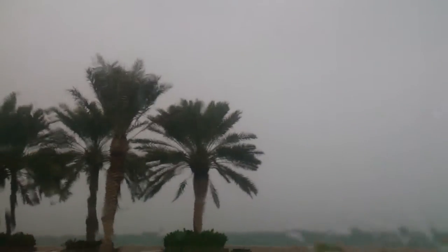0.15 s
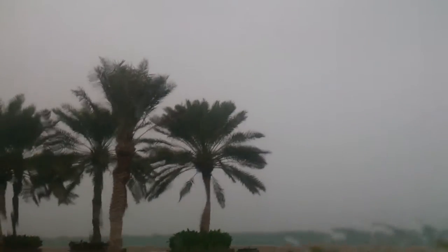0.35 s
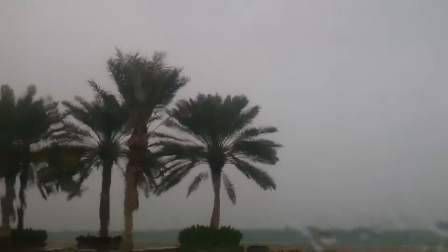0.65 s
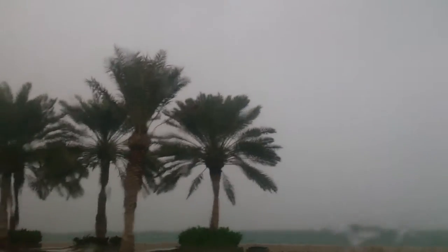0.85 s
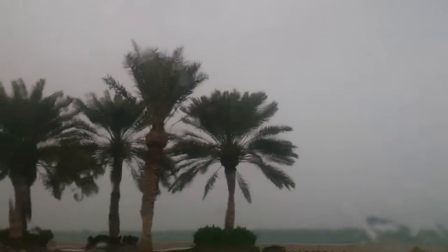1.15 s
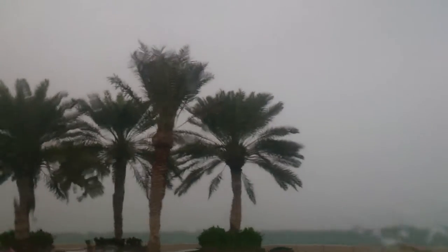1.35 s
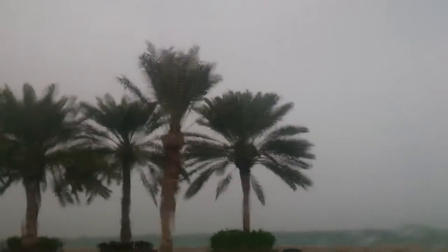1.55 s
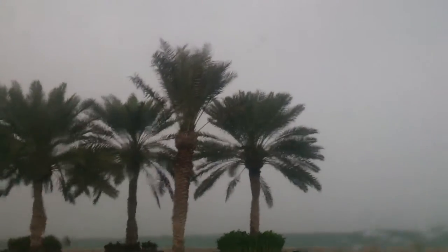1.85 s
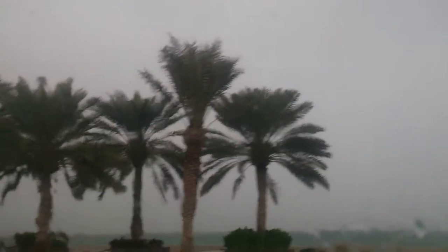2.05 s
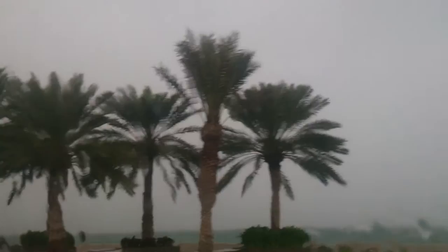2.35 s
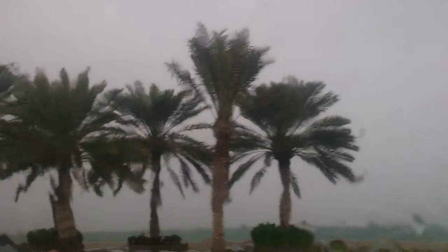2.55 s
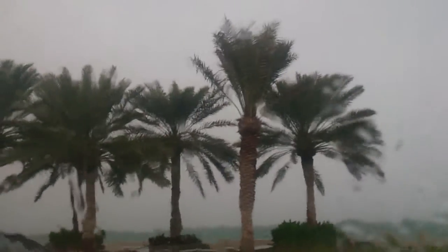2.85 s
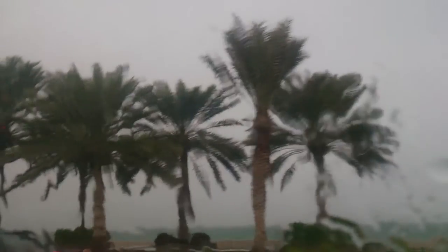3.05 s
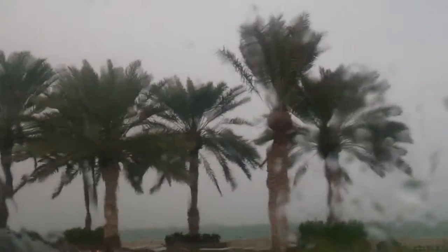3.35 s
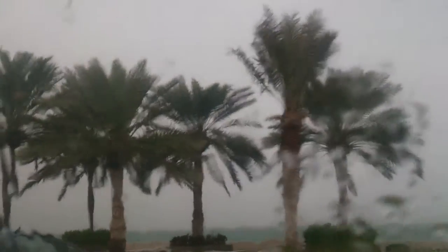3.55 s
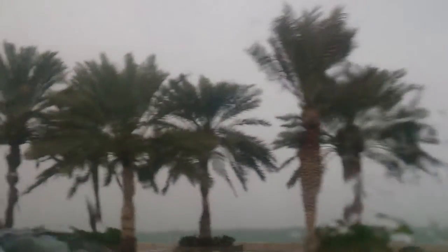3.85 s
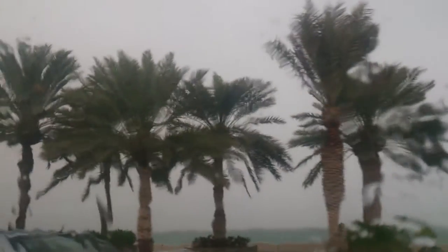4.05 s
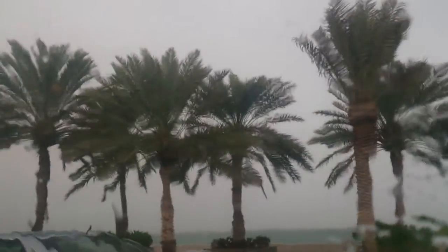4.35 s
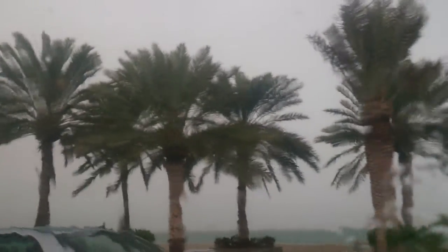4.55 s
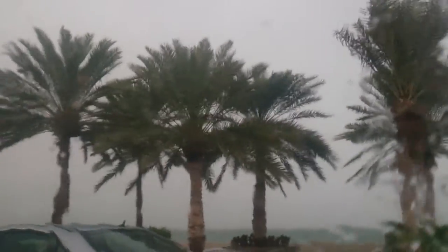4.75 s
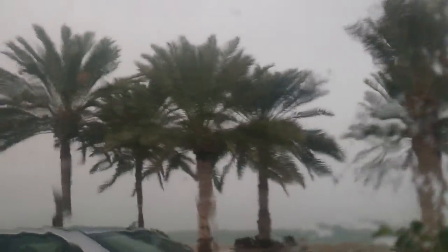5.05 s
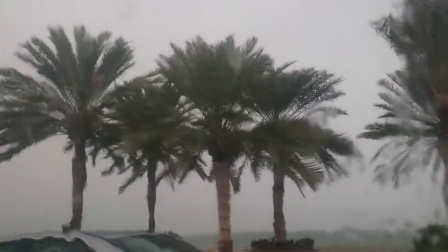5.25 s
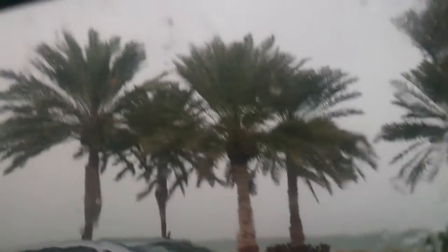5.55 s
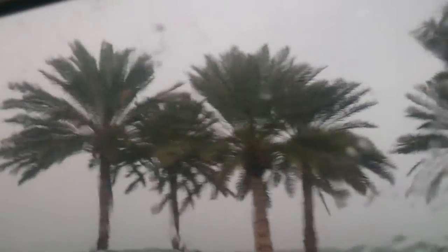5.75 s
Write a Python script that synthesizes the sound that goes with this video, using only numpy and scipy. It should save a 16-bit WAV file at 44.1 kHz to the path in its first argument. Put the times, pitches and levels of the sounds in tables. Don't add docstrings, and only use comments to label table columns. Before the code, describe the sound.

From inside a closed, creeping car, wind shoves the body with a deep, shuddering rumble while the engine booms low, rising briefly past the middle and sinking again. Rain hisses softly on roof and glass. Fine ticks scatter throughout, and heavy drops knock a panel close to the left microphone, mostly in the second half. Small trim rattles and two tiny seal squeaks pass quickly.

```python
import sys
import numpy as np
from scipy import signal
from scipy.fft import rfft, irfft, next_fast_len
from scipy.io import wavfile
from scipy.ndimage import uniform_filter1d, map_coordinates

SR = 44100
rng = np.random.default_rng(int(sys.argv[2]) if len(sys.argv) > 2 else 0)


def materialize(psi):
    bounded = np.clip(np.atleast_2d(psi).T, -1, 1)
    quanta = np.round(bounded * 32767).astype(np.int16)
    wavfile.write(sys.argv[1], SR, quanta)


def ratio(d):
    e = np.asarray(d, float) / 20
    return 10 ** e


N = 260190
TOP_HZ = 14750


def unit(x):
    return x / np.sqrt(np.mean(x ** 2) + 1e-20)


def along(points, hz):
    f, v = np.transpose(points)
    return np.interp(np.log(hz + 1), np.log(f + 1), v)


def curves(rows):
    s, *cols = np.transpose(rows)
    return [np.interp(np.arange(N) / SR, s, c) for c in cols]


def wobble(rate):
    knots = rng.standard_normal(400)
    return map_coordinates(knots, [np.arange(N) * rate / SR], mode="mirror")


def swells(rows):
    t = np.arange(N) / SR
    return sum(db * np.exp(-((t - s) / half) ** 2) for s, db, half in rows)


def filtered(x, response):
    m = next_fast_len(x.shape[-1] + 8192)
    spectrum = rfft(x, m) * response(np.fft.rfftfreq(m, 1 / SR))
    return irfft(spectrum, m)[..., :x.shape[-1]]


def resonance(f, hz, width_hz):
    return 1j * f * width_hz / (hz * hz - f * f + 1j * f * width_hz)


def add(track, s, sound):
    part = track[..., round(s * SR):][..., :sound.shape[-1]]
    part += sound[..., :part.shape[-1]]


def cabin(source, spectrum):
    # frequency in Hz, left minus right in dB.
    left_minus_right = [(25, -6), (110, -7), (220, -5.5), (370, -3), (700, -8), (1500, -12.5), (2150, -5.5),
                        (3000, -11), (5600, -12), (6400, -15), (7600, -18), (8600, -8.5), (11000, -10),
                        (14000, -8)]
    # frequency in Hz, likeness of left and right from 0 to 1.
    likeness = [(20, 0.69), (100, 1), (200, 0.81), (400, .8), (650, .72), (1150, .55), (1700, 0.08),
                (12000, 0.033)]
    # frequency in Hz, lead of the left microphone in radians.
    left_lead = [(250, .1), (400, -.1), (650, -.8), (1150, -2.2), (2000, -3)]

    def blend(hz):
        angle = np.arccos(np.clip(along(likeness, hz), 0, 1)) / 2
        return ratio(along(spectrum, hz)) * np.array([np.cos(angle), np.sin(angle)])

    def share(hz):
        left = np.array([[1], [0]])
        tilt_db = along(left_minus_right, hz)
        return ratio(tilt_db * left) / (1 + ratio(tilt_db)) * np.exp(1j * along(left_lead, hz) * left)

    both, apart = filtered(source, blend)
    pair = filtered(np.array([both + apart, both - apart]), share)
    return pair / np.std(pair.mean(0))


def rush(patchy_db, drops=0, drop_share=0):
    z = signal.stft(rng.standard_normal((2, N)), nperseg=512)[2]
    field = uniform_filter1d(rng.standard_normal(z.shape[1:]), size=7, axis=0)
    field = uniform_filter1d(field, size=10, axis=1)
    noise = unit(signal.istft(z * ratio(patchy_db * unit(field)), nperseg=512)[1][:, :N])
    sizes_db = np.minimum(3 * rng.exponential(size=(2, N)), 9)
    struck = rng.random((2, N)) < drops / SR
    hits = struck * ratio(sizes_db) * rng.choice([-1, 1], (2, N))
    return noise + drop_share * unit(hits)


def buffet(wind_db):
    # frequency in Hz, level in dB per Hz.
    body_spectrum = [(8, -19), (15, -1), (24, 1.5), (30, -2.5), (45, -6.5), (58, -3), (72, -6), (90, -19.5),
                     (140, -29.5), (220, -45), (400, -87)]
    # time in seconds, rise in dB, half length in seconds.
    shoves = [(.14, 5.5, 0.032), (.9, 4, 0.13), (2.2, 5, 0.12), (3.05, 3.5, 0.39), (3.85, 2, 0.15),
              (4.83, 7.5, 0.098), (5.6, 2.5, 0.24)]
    level_db = -29 + 0.96 * wind_db + swells(shoves) + 0.2 * wobble(4.7)
    return ratio(level_db) * cabin(rush(patchy_db=0.5), body_spectrum)


def roar(wind_db, gust):
    # frequency in Hz, level in dB per Hz.
    roar_spectrum = [(76, -12.5), (130, -3), (209, -7), (345, -13), (430, -11), (488, -16), (743, -17.5),
                     (1050, -25), (1600, -42.5), (2080, -61), (3520, -120)]
    level_db = -48 + wind_db + 1.06 * gust + 1.53 * wobble(14)
    return ratio(level_db) * cabin(rush(patchy_db=1.5, drops=110, drop_share=0.39), roar_spectrum)


def rain(rainfall_db, gust):
    # frequency in Hz, level in dB per Hz.
    roof_spectrum = [(650, -8), (1100, -1), (1900, 0.5), (2040, 1.5), (2230, -2), (2960, -4.5), (4090, -4),
                     (4620, -8), (5500, -11.5), (7150, -29), (12100, -120)]
    level_db = -61 + rainfall_db + 0.52 * gust + 0.73 * wobble(32)
    return ratio(level_db) * cabin(rush(patchy_db=1.5, drops=150, drop_share=0.28), roof_spectrum)


def spray(rainfall_db, gust):
    # frequency in Hz, level in dB per Hz.
    glass_spectrum = [(2800, -37), (4800, -9), (6400, 0.5), (7500, 0.5), (8300, -5), (8800, -6.5),
                      (11700, -11.5), (13000, -14.5), (16000, -39)]
    # time in seconds, rise in dB, half length in seconds.
    sheets = [(.54, 2.5, 0.17), (1.4, 2, .15), (2.5, 1.5, 0.17), (3.52, 3.5, 0.13), (4.1, 2.5, .4),
              (4.85, 4, 0.3)]
    level_db = -64.5 + .2 * rainfall_db + swells(sheets) + 0.75 * gust + 0.1 * wobble(29)
    return ratio(level_db) * cabin(rush(patchy_db=1.0, drops=120, drop_share=0.075), glass_spectrum)


def storm():
    # time in seconds, wind in dB, rainfall in dB.
    weather = [(0, 0.5, -1), (.3, -0.5, -1), (.55, -0.5, -2), (.8, 2, 0.5), (1.2, 2, -0.5), (1.65, 0.5, 1),
               (2.1, 0, -1.5), (2.6, 1, 3.5), (3.1, -0.5, -0.5), (3.5, 0.5, 1.5), (3.9, 0.5, 1),
               (4.35, 4, 1.5), (4.6, -2.5, 1), (5, 0, 3.5), (5.3, -2, 2.5), (5.9, 0, 0.5)]
    wind_db, rainfall_db = curves(weather)
    gust = .65 * wobble(11)
    return buffet(wind_db) + roar(wind_db, gust) + rain(rainfall_db, gust) + spray(rainfall_db, gust)


def engine():
    # time in seconds, firing rate in Hz, load in dB.
    running = [(0, 39.12, 3.5), (.3, 40.32, 0.5), (.61, 41.64, 1), (.8, 39.9, -2.5), (1.11, 35.62, -0.5),
               (1.73, 34.7, -2.5), (1.97, 34.1, 3), (2.2, 33.61, 0.5), (2.4, 33.77, 3), (2.68, 34.28, 0.5),
               (3.09, 38.8, -4), (3.5, 49.28, -8), (3.8, 44.41, -9.5), (4.35, 42.23, -2), (4.58, 39.27, 0),
               (5.0, 35.64, -3.5), (5.33, 35.21, -1.5), (5.9, 33.1, -4)]
    # multiple of firing, rms in dB, cabin mode in Hz, its width in Hz, growth in dB per dB of load.
    orders = [
        (1, -19, 34.6, 15.1, 0.93),
        (2, -37, 67.1, 5.7, 0.75),
        (4, -52.5, 169, 52, 0.74),
    ]
    # multiple of firing, rms in dB.
    weak_orders = [(3, -53), (5, -68.5)]
    hz, load_db = curves(running)
    hz_per_s = uniform_filter1d(np.gradient(hz) * SR, size=SR // 3)
    pull_db = np.clip(0.14 * hz_per_s, -6, 6)
    turn = 2 * np.pi * np.cumsum(hz) / SR + .08 * wobble(5)
    x = 0
    for k, db, mode_hz, width_hz, growth in orders:
        near = abs(resonance(k * hz, mode_hz, width_hz))
        if round(k) == 4:
            near = near * ratio(pull_db + 1.5)
        level_db = db + 4.0 + growth * load_db + 1.66 * wobble(5.044)
        x = x + near * ratio(level_db) * np.sin(round(k) * turn + k)
    for k, db in weak_orders:
        x = x + ratio(db + 3.5 + 1.3 * wobble(7)) * np.sin(k * turn + k)
    return np.array([ratio(-3.5) * x, ratio(2.5) * x])


def patter():
    # time in seconds, rise in dB, half length in seconds.
    flurries = [(.07, 6, .15), (1, 6, .3), (2.9, 6, .4)]
    drops_per_s, splash_t60_s = 70, 0.045
    hits = (rng.random(N) < drops_per_s / SR) * ratio(3.7 * rng.standard_normal(N))
    splash = signal.fftconvolve(hits, ratio(-60 * np.arange(1024) / SR / splash_t60_s))[:N]
    sound = filtered(splash * rng.standard_normal((2, N)), lambda f: resonance(f, 3450, 3400) ** 2)
    return ratio(-65 + swells(flurries)) * unit(sound) * ratio([[-5], [-7]])


def ticks():
    # time in seconds, peak in dB, left minus right in dB before 7 dB is added to all.
    small_drops = [(0.0724, -42, -7), (0.0904, -44, -6), (0.1223, -38, -3), (0.3754, -43, -11),
                   (0.7374, -36.5, -12), (0.771, -42, -11.5), (1.0137, -38, -4), (1.0204, -36, -7),
                   (1.0564, -38, -7), (1.1324, -38, -4), (1.153, -35.5, -8), (1.1781, -38, -14),
                   (1.2224, -43, -7), (1.301, -46, -4), (1.508, -38, -11), (1.6902, -35, -8),
                   (2.2164, -33, -14), (2.2987, -38.5, -8.5), (2.4627, -39, -12), (2.8872, -37, -7),
                   (2.9867, -44, -7.5), (3.1138, -36, -10), (3.6497, -45, -9.5), (4.0294, -37, -23),
                   (4.5447, -32, -14), (5.4337, -34, -22), (5.7554, -34.5, -14), (5.7773, -39, -25)]
    t60_s, rise_s = 0.036, 0.0016
    out, t = np.zeros((2, N)), np.arange(2048) / SR
    envelope = ratio(-60 * t / t60_s) * (1 - np.exp(-t / rise_s))
    for s, db, pan_db in small_drops:
        top_db = -27 - .35 * pan_db + 3 * rng.standard_normal()

        def splash(f):
            return resonance(f, 3500, 3800) ** 2 + ratio(top_db) * resonance(f, 6000, 6000) ** 3

        burst = filtered(rng.standard_normal((2, len(t))) * envelope, splash)
        burst = burst / abs(burst).max(1, keepdims=True)
        side = ratio([[pan_db + 7], [0]])
        add(out, s - .001, ratio(db - 10) * burst * 2 * side / side.sum())
    return out


def rattles():
    starts = [1.303, .682, 2.54, 4.024, 5.04]
    # peak in dB, centre in Hz, shaking t60 in seconds, width as a share of the centre.
    trim = [(-31.5, 305, 0.045, 0.1), (-34, 270, 0.025, 0.15), (-44, 780, 0.067, 0.33),
            (-37, 1500, 0.05, 1.1), (-44, 990, 0.082, 1.01)]
    out, t = np.zeros((2, N)), np.arange(6000) / SR
    for s, (db, hz, t60, width) in zip(starts, trim):
        shake = rng.standard_normal((2, len(t))) * ratio(-60 * t / t60) * (1 - np.exp(-t / 0.0063))
        shake = filtered(shake[0] + .5 * shake, lambda f: resonance(f, hz, width * hz) ** 2)
        add(out, s, ratio(db) * shake / abs(shake).max() * ratio([[-4], [3]]))
    return out


def squeak(rows, overtones_db, left_db):
    hz, db = curves(rows)
    t = np.arange(N) / SR
    turn = 2 * np.pi * np.cumsum(hz) / SR
    tone = np.sin(turn)
    for k, overtone_db in enumerate(overtones_db, 2):
        tone = tone + ratio(overtone_db) * (hz * k < TOP_HZ) * np.sin(k * turn)
    tremble_db = 1.9 * np.sin(2 * np.pi * 170 * t + 2 * wobble(60))
    slipping = (t > rows[0][0]) * (t < rows[-1][0])
    return tone * ratio(db + tremble_db) * slipping * ratio([[left_db], [5]])


def seals():
    # time in seconds, pitch in Hz, level in dB.
    rising_slip = [(2.256, 6600, -57), (2.262, 7410, -54), (2.268, 7240, -46), (2.271, 8500, -57),
                   (2.274, 11300, -57)]
    # time in seconds, pitch in Hz, level in dB.
    low_slip = [(5.812, 5600, -66), (5.821, 5050, -55), (5.828, 4700, -62), (5.836, 4850, -56),
                (5.845, 4900, -66)]
    rising = 1.3 * squeak(rising_slip, [-14], left_db=-22)
    return rising + squeak(low_slip, [-5, -11], left_db=-8)


def knocks():
    # mode in Hz, width in Hz, level in dB.
    panel_modes = [(241.5, 64, 1), (368, 88, 2), (632, 103, -1), (956, 110, -6), (1146, 270, 4),
                   (1490, 430, -4)]
    # time in seconds, peak in dB, nearness to the panel's middle, crack in dB.
    hard_drops = [
        (1.585, -15, 0, -19),
        (2.164, -19.5, 0.077, -23),
        (2.368, -29.5, 1.2, -24),
        (3.882, -21.5, 0.17, -23.5),
        (4.188, -22, .7, -25),
        (4.34, -32, 0.69, -30),
        (4.487, -22, 0.55, -28),
        (4.564, -21.5, 0.8, -26),
        (5.024, -15, 0.19, -24),
        (5.628, -20, 0.23, -33),
    ]
    # time in seconds, peak in dB, nearness to the middle, contact in ms.
    soft_drops = [(0.433, -38.5, -0.23, 1.5), (0.66, -31.5, 0.056, 1.16), (0.943, -41, 0.61, 4),
                  (2.131, -31.5, -1.5, 1.82), (2.252, -44, -1.1, 3), (3.2, -39, -0.84, 1.86),
                  (3.648, -46, -0.041, .92), (5.775, -37, 0.72, 1.2)]
    out, t = np.zeros((2, N)), np.arange(2048) / SR - .003
    hard = [(s, db, near, crack_db, 0.58 + 0.074 * near) for s, db, near, crack_db in hard_drops]
    soft = [(s, db, near, -40, contact_ms) for s, db, near, contact_ms in soft_drops]
    splash = ratio(-60 * abs(t) / 0.0024) + ratio(-10 - 60 * abs(t) / 0.045)

    def splash_tone(f):
        return resonance(f, 2950, 1100) ** 2 + ratio(-7) * resonance(f, 5500, 5000) ** 3

    for s, db, near, crack_db, contact_ms in hard + soft:
        lift_db = [2 + 8.5 * near, 3.5 - 8 * near] + list(rng.normal(0, 1, len(panel_modes) - 2))

        def panel(f):
            return sum(ratio(g + d) * resonance(f, hz, w) for (hz, w, g), d in zip(panel_modes, lift_db))

        ring = -filtered(np.exp(-(2000 * t / contact_ms) ** 2), panel)
        ring = ring / abs(ring).max() * ratio([[0], [-21]])
        burst = (t > 0) * splash * (rng.standard_normal((2, len(t))) + 5 * (abs(t) < 4e-5))
        crack = filtered(burst, splash_tone)
        crack = crack / abs(crack).max(1, keepdims=True) * ratio([[0], [-9]])
        add(out, s, ratio(db + 6.5) * (ring + ratio(crack_db) * crack))
    return out


def scene():
    return storm() + engine() + patter() + ticks() + rattles() + seals() + knocks()


def top_gate(x):
    # lower edge in Hz, upper edge in Hz, share of time off.
    top_bands = [(12800, 13550, .35), (13550, 14250, .86), (14250, 15000, .96)]
    hz, _, z = signal.stft(x, SR, nperseg=1024)
    keep = np.ones(z.shape[1:])
    for lo, hi, off in top_bands:
        band = (hz >= lo) & (hz < hi)
        power = uniform_filter1d((abs(z[:, band]) ** 2).sum((0, 1)), size=2)
        keep[band] = power > np.quantile(power, off)
    return signal.istft(z * keep, SR, nperseg=1024)[1][:, :N]


def band_limit(x):
    return signal.sosfilt(signal.butter(12, 14870, fs=SR, output="sos"), x)


def record(dry):
    def microphones(hz):
        bass_cut = 1j * hz / (45 + 1j * hz)
        return np.array([bass_cut, 1 + 0 * hz]) / (1 + (hz / TOP_HZ) ** 60)

    return band_limit(top_gate(filtered(dry, microphones)))


dry = scene()
out = record(dry)
materialize(out)
```